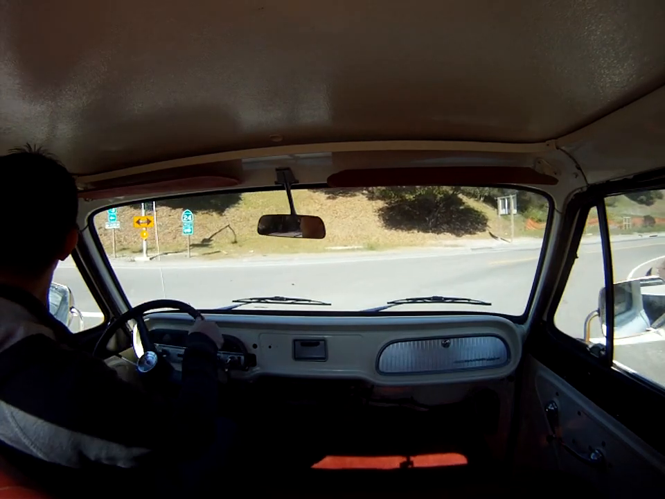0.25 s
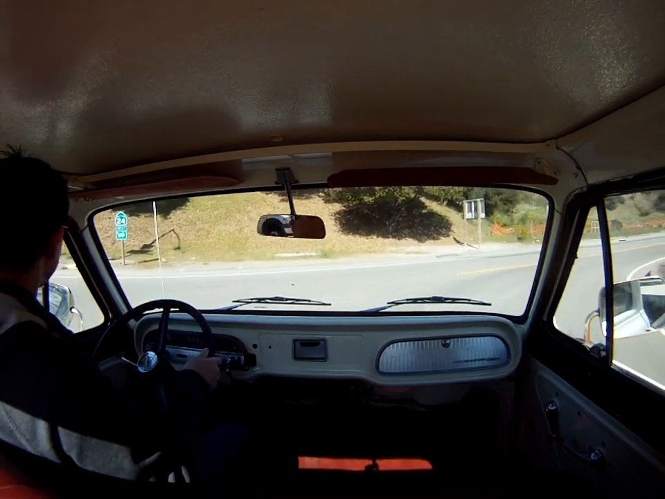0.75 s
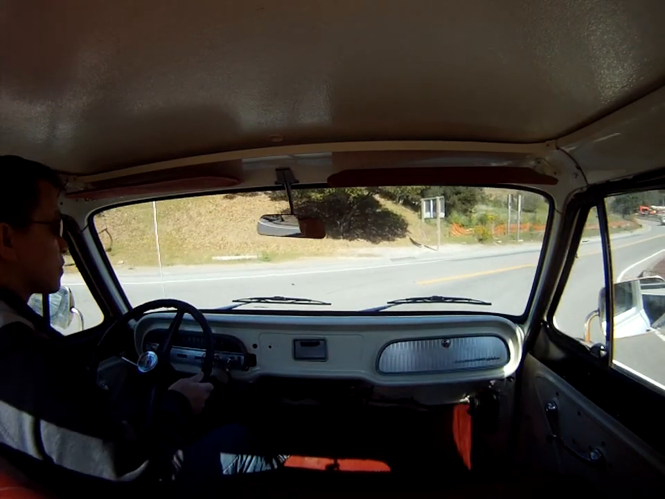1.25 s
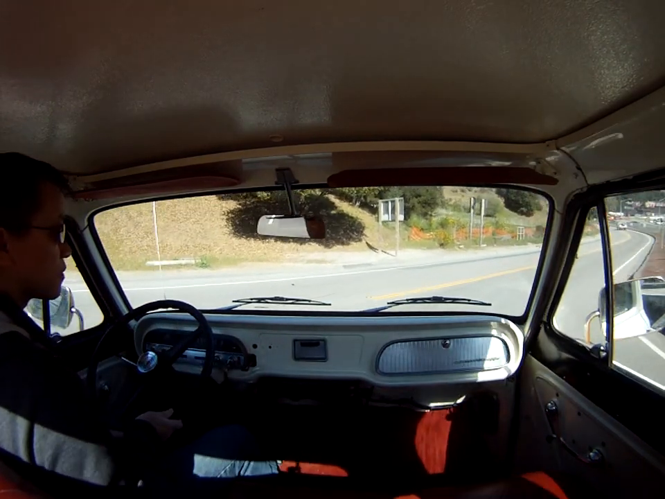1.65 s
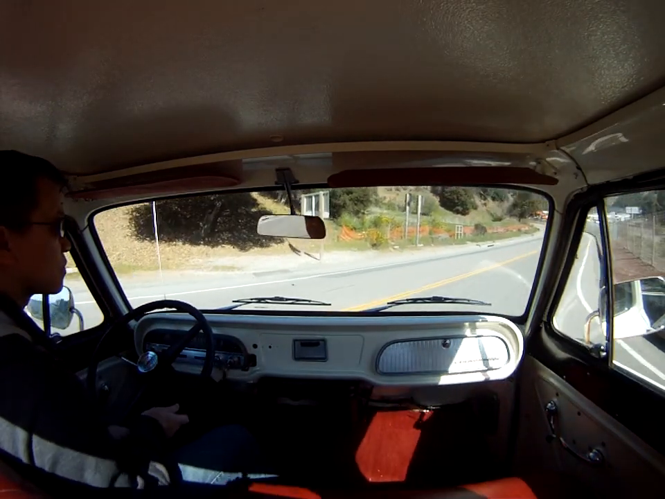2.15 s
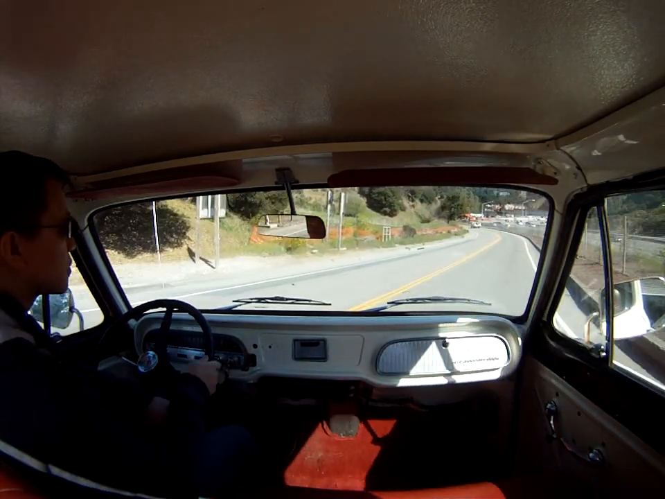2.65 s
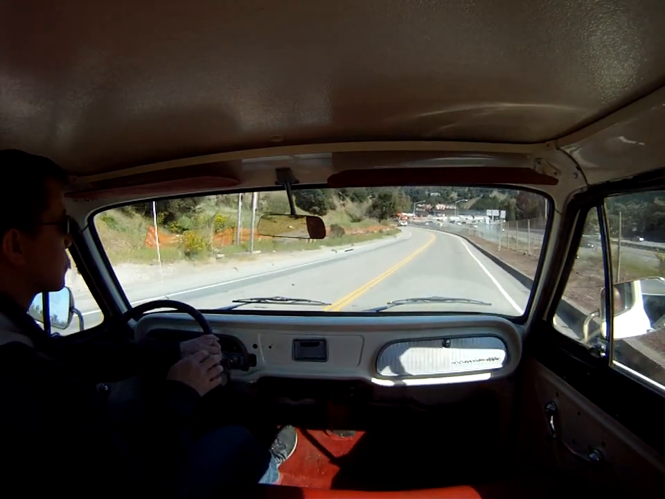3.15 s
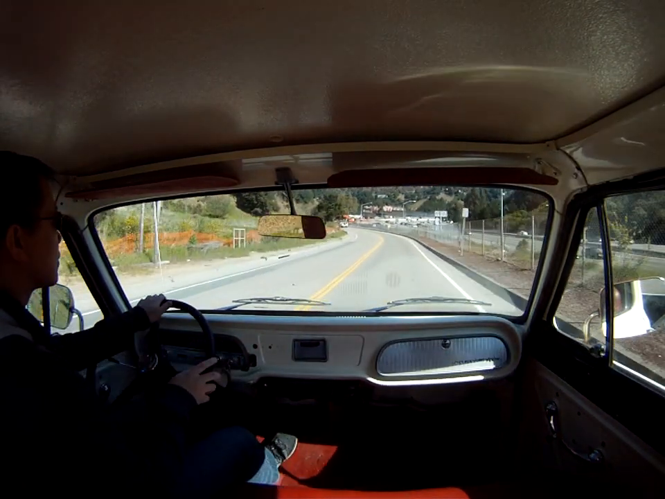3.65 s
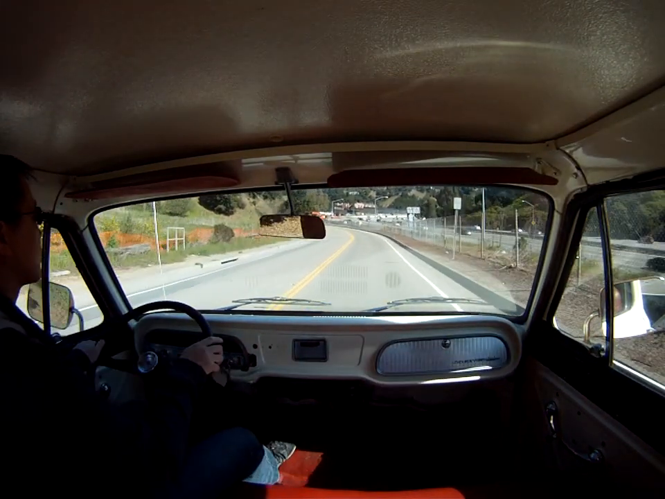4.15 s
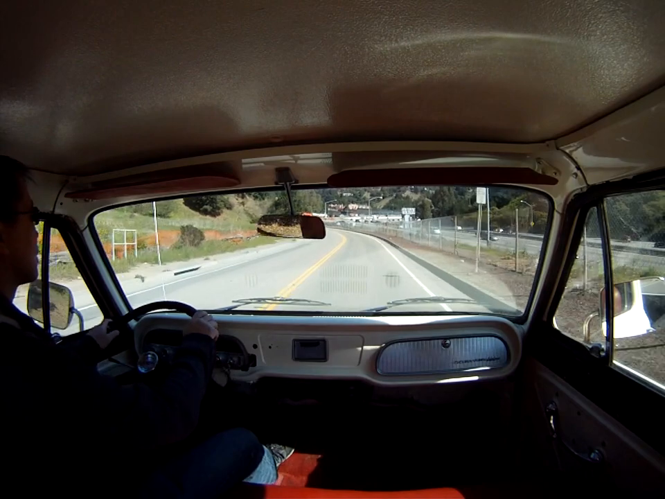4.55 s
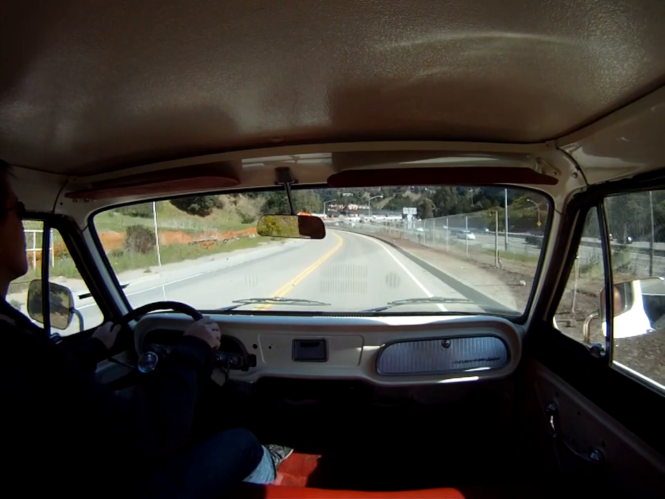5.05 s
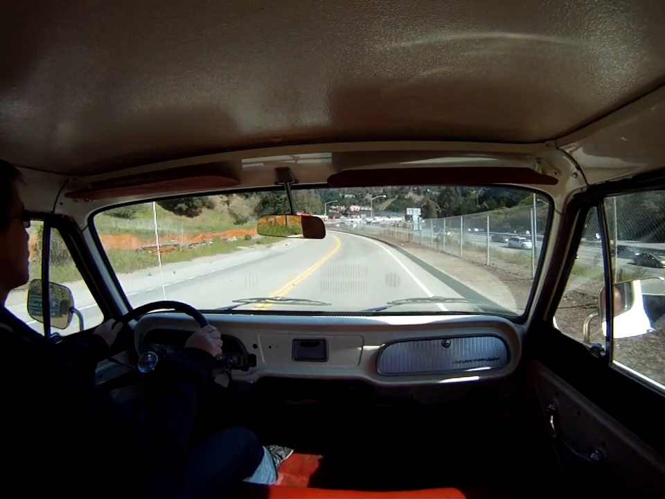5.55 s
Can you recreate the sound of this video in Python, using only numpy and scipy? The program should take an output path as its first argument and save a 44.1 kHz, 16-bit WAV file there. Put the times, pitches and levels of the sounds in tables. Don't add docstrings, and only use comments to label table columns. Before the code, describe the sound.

Heard inside a bare steel truck cab: low lumpy road rumble and a slow, loping engine, with small rattles and one hard gear lever clunk at about half a second. Just after one second the clutch takes up, the engine note jumps, then rises steadily and grows louder to the end, with valve clatter and bumps. The sound is nearly mono, dull and slightly gritty.

```python
import sys
import numpy as np
from scipy import signal
from scipy.fft import rfft, irfft, next_fast_len
from scipy.io import wavfile
from scipy.ndimage import uniform_filter1d

SR = 44100
rng = np.random.default_rng(int(sys.argv[2]) if len(sys.argv) > 2 else 0)


def field_ratio(decibels):
    return 10 ** (np.asarray(decibels, dtype=float) / 20)


def transcribe(signal):
    frames = np.atleast_2d(signal).T
    limited = np.clip(frames, -1, 1)
    pcm = np.round(limited * 32767).astype(np.int16)
    wavfile.write(sys.argv[1], SR, pcm)


N = 256220
PADDED = next_fast_len(N)
HZ = np.maximum(np.arange(PADDED // 2 + 1) * SR / PADDED, 1)
TIME_S = np.arange(N) / SR

CURVED_ORDERS = (2, 3, 4, 5, 6, 7, 8, 9, 10)


def rms_one(x):
    return x / np.sqrt(np.mean(x ** 2) + 1e-20)


def in_time(rows):
    time_s, value = np.transpose(rows)
    return np.interp(TIME_S, time_s, value)


def at_hz(points, hz):
    point_hz, level_db = np.transpose(points)
    return np.interp(np.log(hz), np.log(point_hz), level_db)


def bell(centre_s, width_s):
    return np.exp(-((TIME_S - centre_s) / width_s) ** 2)


def drift(rate_hz):
    r = np.exp(-80 * np.pi * rate_hz / SR)
    slow = signal.lfilter([1], [1, -2 * r, r * r], rng.standard_normal(N // 40 + 2002))[2000:]
    return np.interp(np.arange(N) / 40, np.arange(len(slow)), rms_one(slow))


def band_pass(x, order, low_hz, high_hz):
    return signal.sosfilt(signal.butter(order, [low_hz, high_hz], "band", fs=SR, output="sos"), x)


def mode_gain(modes, hz):
    return np.sqrt(sum(field_ratio(db) ** 2 / (1 + (2 * (hz - f) / w) ** 2) for f, w, db in modes))


def coloured(x, spectrum, tint):
    gain = field_ratio(at_hz(spectrum, HZ)) * tint
    return rms_one(irfft(rfft(x, PADDED) * gain, PADDED)[:N])


def cab_gain(hz):
    # pitch_hz, width_hz, level_db
    cab_modes = [(47, 28, 10.5), (83, 45, 12.5), (136, 19, -19), (191.4, 22.3, 12.5), (280, 81, -38.5),
                 (333, 29, -2.5), (441, 22, -5.5), (493, 86, -9.5), (576, 35, -1), (669, 40, -3.5)]
    return mode_gain(cab_modes, hz)


def road(idle):
    # pitch_hz, density_db (per Hz)
    rumble_spectrum = [(12, -16), (22, 1), (40, 2.5), (70, -1), (100, -1), (140, 2), (200, -19), (280, -12),
                       (400, -56)]
    # centre_s, rise_db
    bumps = [(.1, 5.5), (.4, 2.5), (.63, 1), (.9, 1.5), (1.28, 9.5), (1.96, 6), (2.39, 9), (2.75, 6),
             (2.95, 5.5), (3.2, 9), (3.45, 6.5), (3.75, 6.5), (4.05, 2), (4.72, 5), (5.1, 8), (5.35, 2.5),
             (5.6, 7.5)]
    level_db = -30.5 + 6 * idle
    level_db = level_db + sum(rise_db * bell(centre_s, width_s=0.11) for centre_s, rise_db in bumps)
    lumps_db = 1.5 * drift(11)
    rumble = coloured(rng.standard_normal(N), rumble_spectrum, 0.5 + cab_gain(HZ))
    return field_ratio(level_db + lumps_db) * rumble


def knocks():
    # start_s, peak_db, thud_db, t60_s, crack_db (re peak)
    blows = [(0.1084, -35.5, -24, 0.06, -25), (0.2149, -35.5, -26, 0.13, -29),
             (0.291, -32.5, -34, 0.24, -9.5), (0.4875, -32, -24.5, 0.15, 0),
             (0.5397, -13, -15.5, 0.13, -32), (0.5762, -25.5, -24.5, 0.17, -28),
             (0.6863, -39, -36, 0.22, -18), (0.8144, -28.5, -20, 0.2, -11.5),
             (1.101, -35.5, -26.5, 0.34, -15), (1.568, -33, -36, 0.12, -16), (2.1865, -50, -29, 0.044, -21),
             (2.2558, -57, -27, 0.09, -21), (2.5305, -47, -31, 0.11, -7), (2.7375, -59, -33, 0.071, -25),
             (2.8365, -29.5, -20.5, 0.076, -23), (3.17, -35, -27, 0.1, -13), (3.4246, -33, -27, 0.1, 4.5),
             (3.8186, -36.5, -26.5, 0.09, 0), (4.6745, -31, -14, 0.067, -25)]
    # pitch_hz, level_db, t60_s
    lever_modes = [(206, 4, 0.18), (413, -1, .07), (570, -2.5, 0.072), (676, 0, 0.044), (950, -5.5, 0.039),
                   (1384, -12, 0.088), (1460, -5.5, 0.037), (1910, 3, 0.015), (2210, -5, 0.031)]
    out = np.zeros(N)
    t = np.arange(int(0.3 * SR)) / SR
    for start_s, peak_db, thud_db, t60_s, crack_db in blows:
        contact = (1 - np.exp(-t / 0.0011)) * (1 + 0.92 * np.exp(-t / 0.0044))
        decay = field_ratio(-60 * t / np.clip(t60_s, 0.02, 0.3))
        rattle = rng.standard_normal(len(t)) * contact * decay
        low = 0.45 * band_pass(rattle, 2, 180, 1150)
        high = 0.8 * band_pass(rattle, 3, 650, 3500)
        crack = band_pass(rattle * field_ratio(-10 * t / 0.05), 3, 3000, 5000)
        strengths_db = rng.normal(0, 2.0, len(lever_modes))
        for (hz, db, ring_s), extra_db in zip(lever_modes, strengths_db):
            r = field_ratio(-60 / (0.5 * ring_s * SR))
            w = 2 * np.pi * hz / SR
            rung = signal.lfilter([0, 0.035 * np.sin(w)], [1, -2 * r * np.cos(w), r * r], rattle)
            rung = rung * field_ratio(db + extra_db)
            if hz < 800:
                low = low + rung
            else:
                high = high + rung
        high = high / abs(high).max() + field_ratio(crack_db) * crack / abs(crack).max()
        blow = field_ratio(peak_db) * high + field_ratio(thud_db + 3.0) * low / abs(low).max()
        i = round(start_s * SR)
        out[i:i + len(t)] += blow[:N - i]
    return out


def crank_angle(turns_per_s):
    return 2 * np.pi * np.cumsum(uniform_filter1d(turns_per_s, size=2500)) / SR


def gated_noise(angle, turn_db, firing_db, uneven_db):
    firing = (angle / np.pi).astype(int)
    uneven = uniform_filter1d(rng.standard_normal(N)[firing], size=90)
    swell_db = turn_db * np.cos(angle) + firing_db * np.cos(2 * angle + np.pi) + uneven_db * uneven
    return rng.standard_normal(N) * field_ratio(swell_db)


def roar(angle, roar_db):
    # pitch_hz, density_db (per Hz)
    roar_spectrum = [(100, -29), (200, 4), (300, 3), (420, 6), (580, 2.5), (720, -1), (850, -6.5),
                     (1100, -17.5)]
    noise = gated_noise(angle, turn_db=1.0, firing_db=1.5, uneven_db=0.4)
    return field_ratio(roar_db + 1.5) * coloured(noise, roar_spectrum, 0.14 + cab_gain(HZ))


def clatter(angle, effort_db, idle):
    # pitch_hz, density_db (per Hz)
    clatter_spectrum = [(470, -32), (800, -0.5), (1050, 0.5), (1370, -7), (1520, -3), (1660, -5),
                        (1880, -6.5), (1970, -4), (2270, -4), (2510, -4), (3660, -9), (4120, -14),
                        (4990, -13.5), (5900, -28), (7670, -43), (13000, -120)]
    # pitch_hz, width_hz, level_db
    tin_modes = [(1300, 50, 0), (1990, 90, 2), (2290, 150, 5), (3180, 90, 1), (3660, 80, 6), (4200, 80, 1),
                 (5100, 200, 3)]
    top_db = -2.5 - 3.5 * idle
    noise = gated_noise(angle, turn_db=1.0, firing_db=0.5, uneven_db=1.2)
    hiss = rfft(coloured(noise, clatter_spectrum, 0.6 + 0.4 * mode_gain(tin_modes, HZ)), PADDED)
    octave = np.log2(HZ / 600)
    together = drift(23.0)
    out = 0
    for k in range(8):
        share = np.cos(np.pi / 2 * np.clip(2 * octave - k, -1, 1)) ** 2
        band = irfft(hiss * share, PADDED)[:N]
        flicker_db = 0.5 * together + 1.2 * drift(21)
        out = out + band * field_ratio(flicker_db + top_db * np.clip((k - 4) / 2, 0, 1))
    return field_ratio(-44 + effort_db - 0.44) * out


def tappets(angle, effort_db, idle):
    # centre_s, rise_db
    lugs = [
        (1.41, 9.1),
        (1.76, 13),
        (2.36, 7),
    ]
    tick_db = -45 + 0.81 * effort_db - 4 * idle
    tick_db = tick_db + sum(rise_db * bell(centre_s, width_s=0.11) for centre_s, rise_db in lugs)
    seats = np.diff(np.floor(angle / np.pi), prepend=0) * field_ratio(3.0 * rng.standard_normal(N))
    decay = np.exp(-1 / (0.0014 * SR))
    bursts = signal.lfilter([1], [1, -decay], seats + 1e-18) * rng.standard_normal(N)
    return field_ratio(tick_db) * band_pass(bursts, 2, 3600, 6500)


def order_levels(turns_per_s, effort_db, idle):
    # level_db, effort_share, clutch_out_change_db
    orders = [(-19, -.5, -6), (-28, 0.92, -9.5), (-33, 1.05, 15), (-32, -0.36, -7.5), (-37, 0.63, 5),
              (-42.5, .83, -3.5), (-44.5, 1.15, -4), (-48.5, 0.76, 4.5), (-51, 1.54, 7)]
    # pitch_hz, width_hz, level_db
    path_modes = [(69.6, 26, -0.06), (107.4, 18, 2.5), (133.7, 22.6, 5), (178.2, 8.1, 4.5), (207, 8.6, 0.4),
                  (237, 8.6, 0), (270.3, 36, -2.5), (328, 5.5, -1), (374, 34, -5.8), (407, 18, -2),
                  (470, 16, -3.5), (571, 20, 6.5), (547, 28.8, -5), (674, 33.0, -35)]
    # centre_s, change_db
    swells = [
        [(1.2, 3), (4.65, -4)],
        [(1.6, -4.5), (3.0, 3), (4.6, 0.5), (5.75, -4.5)],
        [(1.25, 1), (1.6, 5.5), (2.45, -27), (3.7, 0.5), (4.2, -10), (4.6, 0), (5.0, -5)],
        [(1.7, 8), (2.2, -3), (3.05, -12), (5.05, -7), (5.4, 4.5)],
        [(.4, 4.5), (1.8, -12), (3.8, 4), (4.2, -28), (4.8, 3.5), (5.7, 3.5)],
        [(3.3, 10), (3.65, 7), (5.6, 1.5)],
        [(3.4, 7.5), (4.65, 0)],
        [(4.55, 10), (5.1, 3), (5.6, 8)],
        [(2.9, 2), (4.35, 2.5), (4.75, -7)],
    ]
    rows = []
    for k, (db, share, idle_db), order_swells in zip(CURVED_ORDERS, orders, swells):
        waver_db = (0.4 if k == 2 else 1.0) + 0.8 * idle
        path_db = 20 * np.log10(mode_gain(path_modes, k * turns_per_s))
        path_db = path_db + sum(change_db * bell(s, width_s=0.13) for s, change_db in order_swells)
        rows.append(db + share * effort_db + idle_db * idle + path_db + waver_db * drift(5.3))
    return rows


def exhaust_tones(turns_per_s, angle, order_db, roar_db):
    # crank_multiple, level_db
    other_orders = [(1, -3.5), (4.5, -0.5), (10.5, -13.5), (11, -3), (12, -7)]
    out = 0
    for k, db in zip(CURVED_ORDERS, order_db):
        phase = k * angle + 0.3 * drift(2.25) + rng.uniform(0, 2 * np.pi)
        out = out + field_ratio(db) * np.sin(phase)
    for k, db in other_orders:
        phase = k * angle + 0.22 * drift(1.7) + rng.uniform(0, 2 * np.pi)
        out = out + field_ratio(db + roar_db - 10.0) * cab_gain(k * turns_per_s) * np.sin(phase)
    return np.sqrt(2) * out


def scene():
    # time_s, crank_turns_per_s
    speed = [(0, 20.42), (.2, 24), (.5, 21.75), (.75, 22.96), (1.05, 22.42), (1.15, 22.61), (1.3, 28.04),
             (1.46, 36.19), (1.55, 38.51), (1.7, 39.73), (2.3, 43.55), (2.5, 43.88), (2.9, 47.37),
             (3.5, 52.39), (4.1, 55.98), (4.9, 61.32), (5.1, 63.12), (5.81, 68.2)]
    # time_s, level_db
    effort = [(0.0, -49.5), (0.76, -49), (1.0, -46.5), (2.12, -51.5), (2.61, -48), (3.32, -39.5),
              (3.74, -40), (3.93, -42), (4.24, -42.5), (4.58, -40), (5.4, -38), (5.81, -33.5)]
    turns_per_s = in_time(speed)
    effort_db = in_time(effort) + 45
    clutch_bites_s, take_up_s = 1.15, 0.22
    idle = np.clip(1 - (TIME_S - clutch_bites_s) / take_up_s, 0, 1)
    angle = crank_angle(turns_per_s)
    roar_db = -34.5 + 0.74 * effort_db + 0.5 * idle
    order_db = order_levels(turns_per_s, effort_db, idle)
    engine = exhaust_tones(turns_per_s, angle, order_db, roar_db) + roar(angle, roar_db)
    engine = engine + clatter(angle, effort_db, idle) + tappets(angle, effort_db, idle)
    mono = road(idle) + knocks() + engine
    return np.array([mono, mono])


def channel_grit(mono):
    # pitch_hz, side_minus_mid_db
    grit_spectrum = [(60, -46.5), (150, -38), (400, -34), (1000, -21), (2300, -30.5), (4400, -24.5),
                     (6000, -21.5), (8000, -23), (10500, -31), (12000, -37), (13500, -36), (15000, -30)]
    hz, frames, cells = signal.stft(mono, SR, nperseg=2048)
    usual = np.median(abs(cells), axis=1) * field_ratio(at_hz(grit_spectrum, hz + 1))
    fitful = field_ratio(-2.5 + 17.2 * np.clip(rng.standard_normal(len(frames)), -3, 1.1))
    grit = np.outer(usual, fitful) * np.exp(2j * np.pi * rng.random(cells.shape))
    return signal.istft(grit, SR, nperseg=2048)[1][:N]


def band_limit(x):
    return signal.sosfilt(signal.butter(12, 16450, fs=SR, output="sos"), x)


def record(dry):
    mono = 0.94 * np.tanh(dry[0] / 0.84)
    held = np.repeat(signal.resample_poly(mono, 40, 147), 4)
    mono = signal.resample_poly(held, 147, 160)[:N]
    side = channel_grit(mono)
    top_cut = signal.cheby2(14, 45, 15450, fs=SR, output="sos")
    mix = signal.sosfilt(top_cut, [mono + side, mono - side])
    return band_limit(mix)


dry = scene()
out = record(dry)
transcribe(out)
```